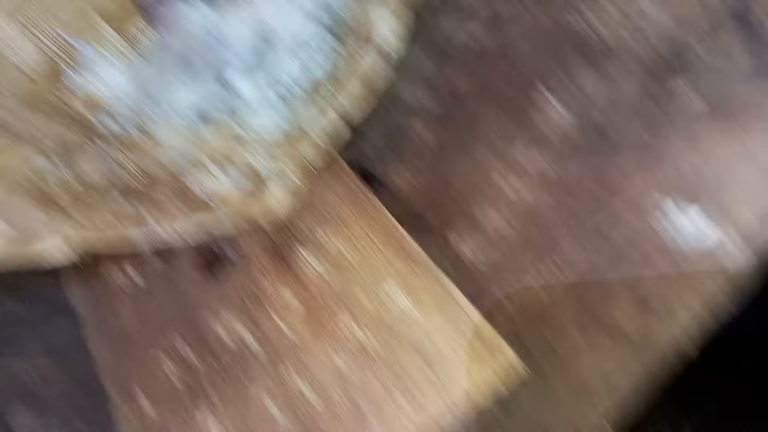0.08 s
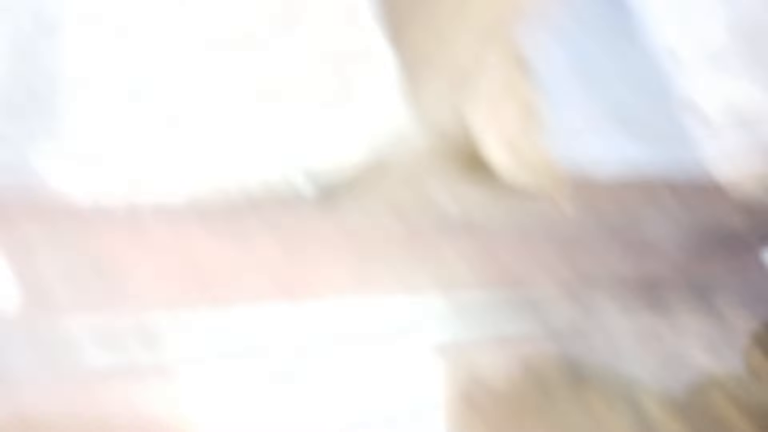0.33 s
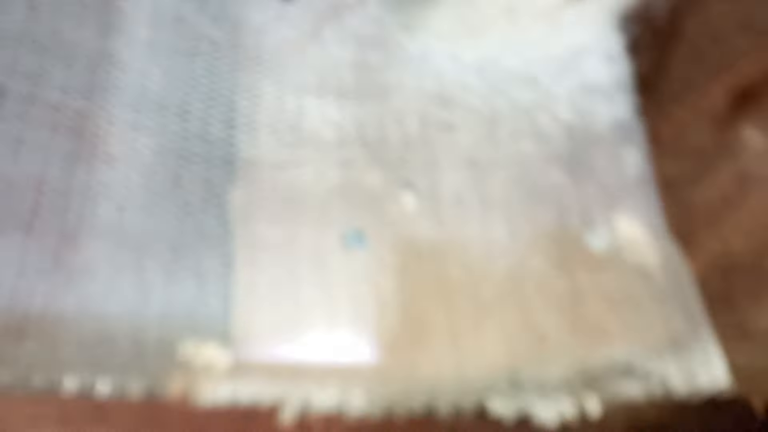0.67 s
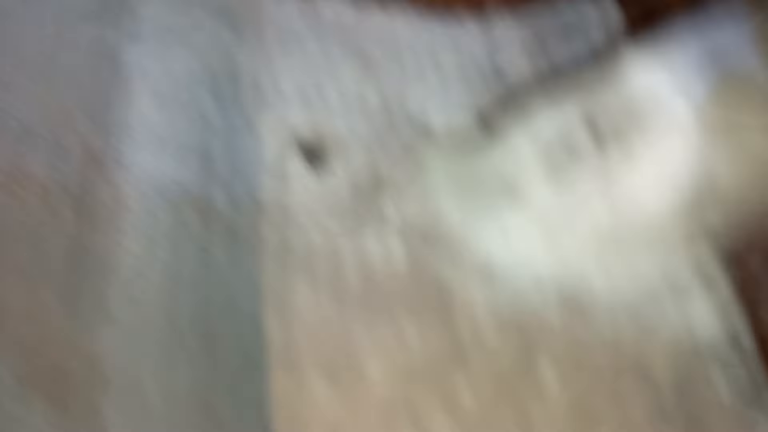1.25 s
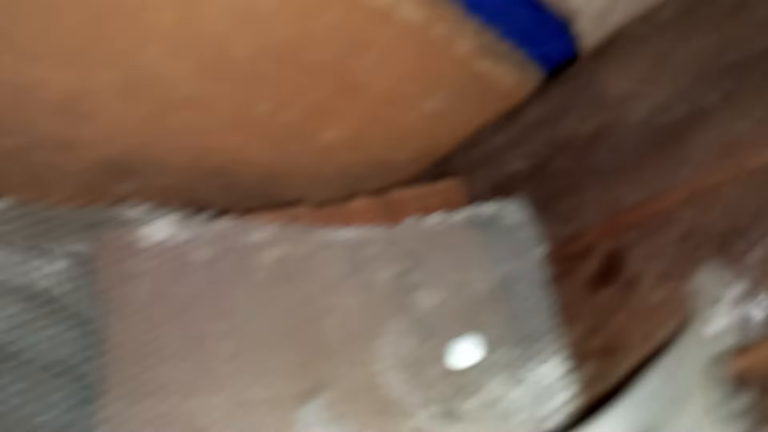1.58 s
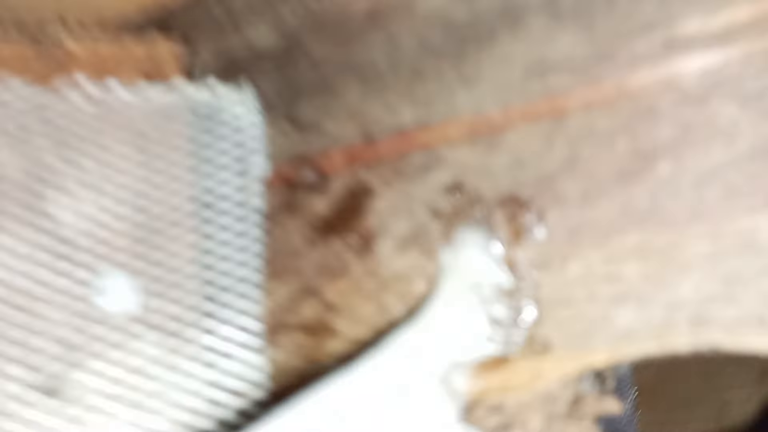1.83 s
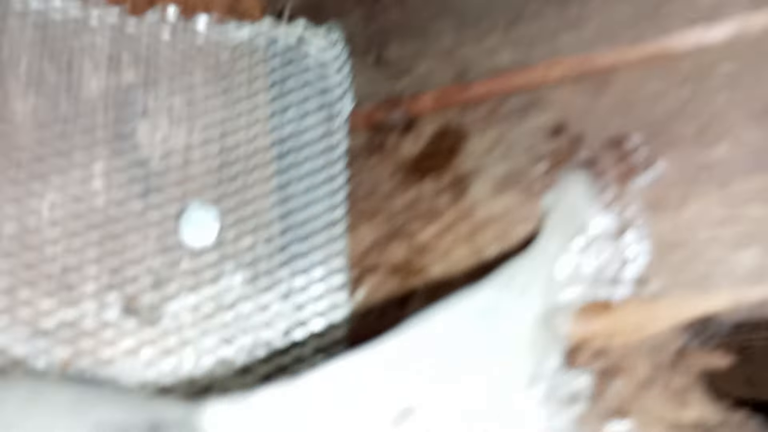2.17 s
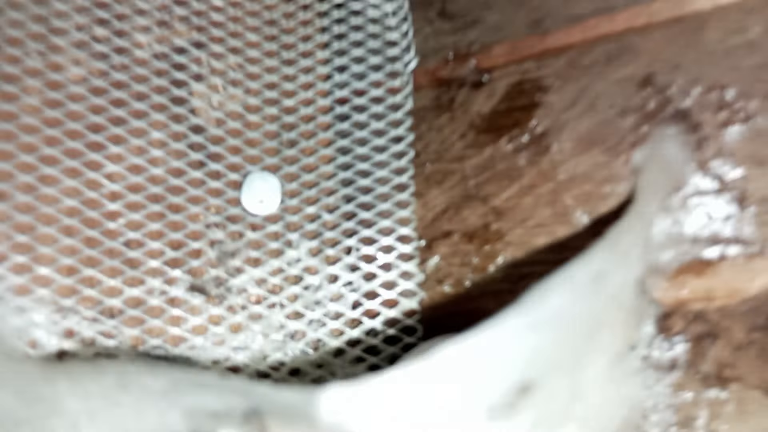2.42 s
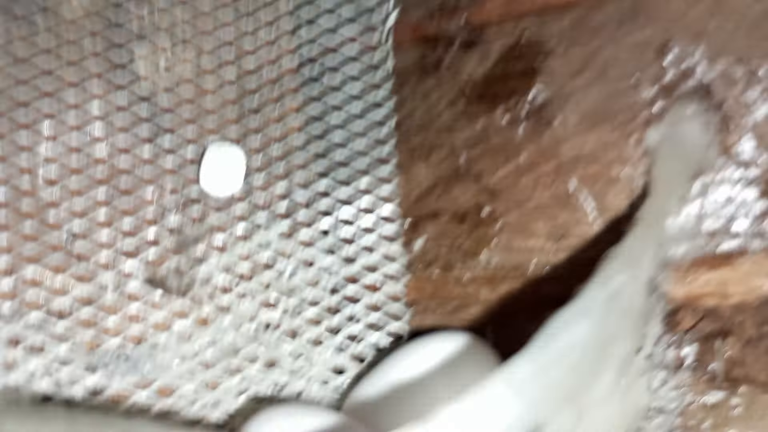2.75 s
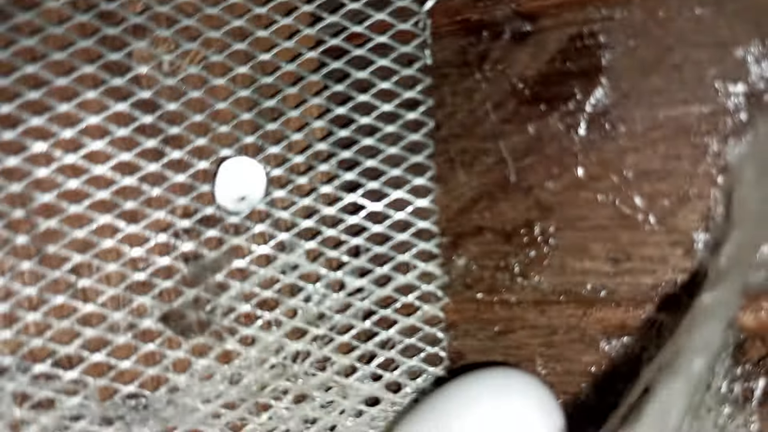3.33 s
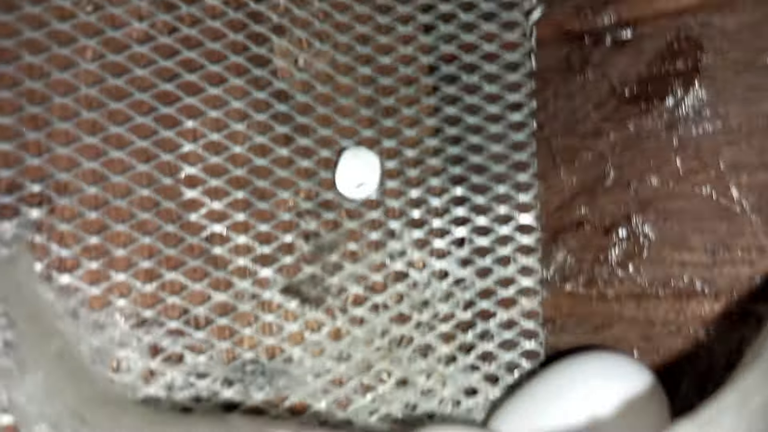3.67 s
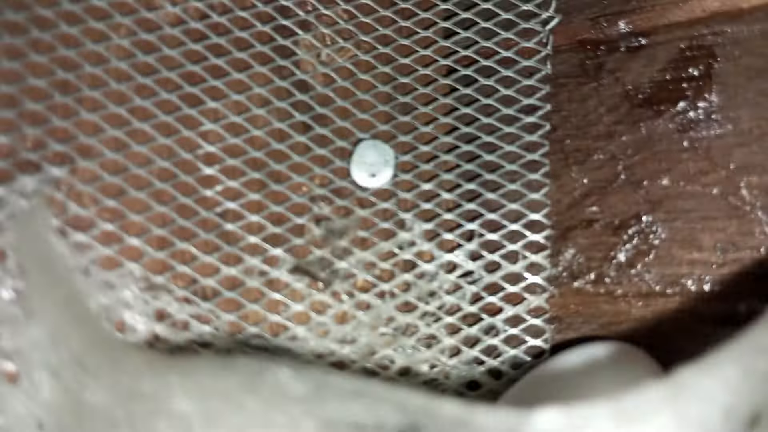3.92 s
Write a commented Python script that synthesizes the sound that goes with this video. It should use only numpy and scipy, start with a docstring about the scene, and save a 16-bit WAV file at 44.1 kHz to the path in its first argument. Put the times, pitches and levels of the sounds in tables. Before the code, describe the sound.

A colony of swiftlets twitters throughout the four seconds in an enclosed, slightly echoing room. From 0.4 seconds, a close bird repeats high, rising, slightly rough whistles about twice a second, loudest around 2.4 and 2.8. Another answers lower amid distant chirps. Faint bumps and rumble lie beneath, with a tick at 2 seconds. Sharp bird clicks come between 2.5 and 3.8 seconds.

```python
"""Inside a closed bird house, a colony of swiftlets twitters without pause.
One bird close by repeats a long, rising, slightly rough whistle, and a second answers lower down.
Others whistle and click further off, over a wash of far chirps and a faint rumble. Each whistle is
a tone with a trembling pitch, and the walls add a short echo. The loudest sounds overload the
microphone into a low crackle, and a few short low thumps and ticks come mostly with loud whistles."""
import sys
import numpy as np
from scipy import signal
from scipy.fft import rfft, irfft
from scipy.io import wavfile

SR = 44100
rng = np.random.default_rng(int(sys.argv[2]) if len(sys.argv) > 2 else 0)


def to_wav(s):
    """Save 16-bit WAV."""
    ch = np.atleast_2d(s).T  # columns
    pcm = np.round(np.clip(ch, -1, 1) * 32767)  # PCM
    wavfile.write(sys.argv[1], SR, pcm.astype(np.int16))


N = 176400
TIME = np.arange(N) / SR

# Levels in these tables are relative. A spectrum says how strong each frequency is.
# the background rumble: (frequency [Hz], level [dB])
RUMBLE_SPECTRUM = [(25, -22), (70, -8), (160, 4.5), (300, -12), (700, -29.5), (1500, 4), (4000, -26.5)]
# how the far colony swells and sinks: (time [s], level [dB])
COLONY_LOUDNESS = [(0, -6), (.04, -16), (.2, -20), (.3, -17.5), (.48, -15), (.52, -19.5), (.62, -18.5),
                   (.8, -17.5), (1.05, -20), (1.25, -19), (1.44, -18), (1.52, -20.5), (1.7, -19.5),
                   (1.92, -17), (1.98, -18.5), (2.15, -23.5), (2.32, -16.5), (2.45, -20), (2.57, -21.5),
                   (2.7, -24), (2.85, -20), (3.1, -22.5), (3.35, -21.5), (3.5, -22.5), (3.68, -17.5),
                   (3.8, -19.5), (4, -20)]
# the tone of the far colony: (frequency [Hz], level [dB])
COLONY_SPECTRUM = [(1200, -45), (1550, -20.5), (1900, -13.5), (2350, -13.5), (2900, -6.5), (3500, 1.5),
                   (4400, -0.5), (5200, -1.5), (5900, -1), (6700, -5.5), (7400, -7.5), (9500, -20),
                   (15500, -35)]
# thin, high twitter above the colony: (time [s], level [dB])
HIGH_TWITTER_LOUDNESS = [(0, -35), (.45, -32.5), (.95, -40.5), (1.15, -30.5), (1.4, -43), (1.65, -28),
                         (2.0, -43), (2.5, -37.5), (2.65, -55), (2.8, -34.5), (3.15, -39), (3.45, -32),
                         (4, -48.5)]
# the tone of that high twitter: (frequency [Hz], level [dB])
HIGH_TWITTER_SPECTRUM = [(6000, -24.5), (7200, 2), (9400, -9), (11700, -13), (13000, -22)]
# low twitter at the bottom of the chorus: (time [s], level [dB])
LOW_TWITTER_LOUDNESS = [(0, -44.5), (1.55, -47.5), (1.75, -25.5), (2.0, -37), (2.3, -30.5), (2.7, -39),
                        (2.95, -39), (4, -30)]
# the answering bird, one list of points per call: (time [s], pitch [Hz], level [dB])
ANSWER_CALLS = [
    [(0, 5570, -27), (.04, 5500, -19), (.1, 5470, -15), (.16, 5590, -23), (.2, 5560, -31)],
    [(.49, 5620, -30), (.56, 5780, -25.5), (.62, 5810, -17.5), (.68, 5720, -25.5), (.78, 5620, -32),
     (.92, 5600, -35), (.97, 5700, -38)],
    [(1.0, 5620, -32), (1.04, 5700, -33), (1.13, 5820, -22), (1.2, 5900, -35), (1.3, 5850, -26),
     (1.38, 5890, -21), (1.48, 5850, -39)],
    [(1.945, 5620, -21), (1.98, 5565, -19.5), (2.06, 5635, -16.5), (2.16, 5655, -20), (2.25, 5720, -19),
     (2.36, 5800, -27), (2.46, 5790, -28), (2.5, 5600, -28)],
    [(2.69, 5600, -31), (2.74, 5510, -21), (2.8, 5730, -23), (2.86, 5800, -23.5), (2.92, 5890, -19.5),
     (3.02, 5900, -26.5), (3.07, 5960, -21), (3.14, 6000, -26)],
    [(3.43, 6000, -18), (3.5, 5830, -30), (3.7, 5760, -27), (3.78, 5660, -32), (3.84, 5660, -23),
     (3.9, 5450, -28), (3.99, 5300, -27)],
]
# the neighbours' whistles:
# (start [s], length [s], first pitch [Hz], last pitch [Hz], level [dB], pitch tremble [Hz])
NEIGHBOUR_WHISTLES = [(0.236, 0.088, 2480, 2311, -34, 120), (.285, 0.081, 9400, 9060, -25.5, 229),
                      (0.306, .11, 8620, 8580, -21, 90), (.429, 0.053, 8200, 7860, -24.5, 151),
                      (0.436, .055, 5120, 4950, -19.5, 150), (0.593, 0.085, 8580, 8420, -29.5, 60),
                      (.69, .17, 8100, 8150, -30.5, 150), (0.702, 0.22, 5050, 5177, -24.5, 60),
                      (1.114, 0.11, 8480, 8080, -26.5, 90), (1.341, .13, 4390, 4184, -24, 131),
                      (1.502, 0.11, 5743, 5750, -26, 60), (1.836, 0.093, 4630, 4430, -24.5, 101),
                      (2.01, .14, 8150, 8350, -32.5, 109.9), (2.19, 0.27, 6130, 6180, -21, 50),
                      (2.239, .15, 6480, 6345, -18, 160), (2.418, 0.13, 8560, 8630, -29, 45),
                      (2.6, 0.13, 2450, 2700, -30.5, 200), (2.814, 0.1, 8350, 8060, -29.5, 100),
                      (3.195, 0.084, 8400, 8760, -26, 40.15), (3.291, 0.1, 8150, 8800, -24.5, 70),
                      (3.393, 0.029, 3570, 3550, -19, 40.4), (3.555, .24, 8450, 8280, -32, 110.5)]
# short low thumps and ticks, mostly at loud whistles: (time [s], peak level [dB], pulse width [s])
LOW_THUMPS = [(.329, -48, 0.0013), (0.449, -31, 0.00089), (0.627, -35, 0.00022), (0.72, -45, 0.00077),
              (0.817, -30.5, 0.00041), (1.744, -33.5, 0.00047), (2.029, -2.5, 0.000083),
              (2.37, -33.5, 0.00064), (2.742, -33.5, 0.00046), (3.733, -50, 0.00068)]
# the near bird, one list of points per call: (time [s], pitch [Hz], level [dB])
NEAR_BIRD_CALLS = [
    [(0.395, 6690, -26), (0.473, 6820, -15.5), (0.5, 6535, -27)],
    [(0.61, 6580, -24), (0.81, 7000, -17.5), (1.02, 7075, -21.5)],
    [(1.15, 6612, -23), (1.224, 6924, -19), (1.485, 6960, -19)],
    [(1.612, 6701, -17.5), (1.744, 6900, -13.5), (1.948, 6853, -18.5)],
    [(2.128, 6465, -16), (2.364, 6716, -9), (2.385, 6161, -21.5)],
    [(2.584, 6264, -20.5), (2.774, 6554, -10), (2.82, 6334, -19.5)],
    [(3.08, 6195, -19), (3.204, 6530, -14.5), (3.24, 6260, -20)],
    [(3.428, 6307, -18.5), (3.728, 6970, -14.5), (3.745, 6710, -18)],
    [(3.865, 7040, -18), (3.903, 6721, -13.5), (4.0, 6950, -15)],
]
# how hoarse each near call is: (pitch tremble [Hz], hiss level against the whistle [dB])
NEAR_HOARSENESS = [(109, -0.5), (50, -2), (60, -7), (112, -8), (119, -9), (40.2, -11), (40, -13.5),
                   (66, -9.5), (130, -7)]
# the weak upper voice in each near call: (level against the whistle [dB])
UPPER_VOICE_LEVELS = [-11, -19.5, -14.5, -26.5, -22, -20, -29.5, -32, -20.5]
# the hiss in the near bird's voice: (frequency [Hz], level [dB])
NEAR_HISS_SPECTRUM = [(1400, -36.5), (2200, -6), (3400, 1.5), (5000, 3.5), (6300, 0.5), (7600, -13),
                      (11000, -24), (15000, -22)]
# clicks that the birds use to find their way by echo: (time [s], level [dB])
ECHO_CLICKS = [(2.527, -16), (2.899, -9), (2.967, -6.5), (3.071, -6), (3.177, -20), (3.282, -5.5),
               (3.391, -14), (3.686, -10.5), (3.769, -26)]
# the tones that ring in one click: (pitch [Hz], level [dB])
CLICK_TONES = [(3500, -1.5), (4300, -25), (5300, -7.5)]


def from_db(db):
    """Turn decibels into a number to multiply a sound by."""
    return 10 ** (np.asarray(db) / 20)


def rms_one(x):
    """Scale a sound so that its average strength (rms) is 1."""
    return x / np.sqrt(np.mean(x ** 2) + 1e-20)


def along(rows):
    """Join a table's points with straight lines: one curve for each column after the time."""
    times, *columns = np.transpose(rows)
    return [np.interp(TIME, times, column) for column in columns]


def add(out, start_s, sound):
    """Mix a sound in at its start time."""
    i = int(np.clip(start_s * SR, 0, len(out)))
    out[i:i + len(sound)] += sound[:len(out) - i]


def butter(x, hz, kind, order=2):
    """Keep the low part, the high part or one band of a sound."""
    return signal.sosfilt(signal.butter(order, hz, kind, fs=SR, output="sos"), x)


def coloured(x, spectrum):
    """Shape a sound with a spectrum, then scale it to strength 1."""
    hz, db = np.transpose(spectrum)
    bin_hz = np.maximum(np.arange(N // 2 + 1) * SR / N, 1)
    gain = from_db(np.interp(np.log(bin_hz), np.log(hz), db))
    return rms_one(irfft(rfft(x) * gain, N))


def tone(hz):
    """A pure tone that follows a pitch curve."""
    return np.sin(2 * np.pi * np.cumsum(hz) / SR)


def waver(rate_hz):
    """A smooth random wobble of strength 1."""
    return rms_one(butter(rng.standard_normal(N), rate_hz, "low"))


def tremble(rate_hz):
    """A fast random shake of strength 1, with no slow drift."""
    return rms_one(butter(rng.standard_normal(N), [rate_hz / 6, rate_hz], "band"))


def gate(start_s, end_s, fade_s):
    """Fade in, hold, fade out."""
    return np.clip(np.minimum(TIME - start_s, end_s - TIME) / fade_s + .5, 0, 1)


def wall_echo(x, echo_db, die_away_s=.36, delay_s=.003):
    """Add the dense echo of the walls, keeping about the same loudness."""
    t = TIME[:SR // 2]
    tail = rng.standard_normal(len(t)) * from_db(-60 * t / die_away_s) * (t > delay_s)
    echo = signal.fftconvolve(x, tail / np.linalg.norm(tail))[:N]
    gain = from_db(echo_db)
    return (x + gain * echo) / np.hypot(1, gain)


def rumble(level_db=-67):
    """Faint, steady noise behind the birds."""
    return from_db(level_db) * coloured(rng.standard_normal(N), RUMBLE_SPECTRUM)


def colony(loudness, spectrum, lowest_hz, highest_hz, wash_db, chirps_per_s=170):
    """Hoarse chirps of far birds overlap and echo; the farthest blur into a wash of noise."""
    chirps = np.zeros(N)
    wash = rng.standard_normal(N)
    hoarseness = 1 + .016 * tremble(351)
    for when, pitch, length, glide, size, part in rng.random((int(chirps_per_s * N / SR), 6)):
        length_s = .05 + .1 * length
        u = np.linspace(-1, 1, int(length_s * SR))   # -1 at the chirp's start, 1 at its end
        octaves = .04982 * (2 * glide - 1) * u - .04007 * u ** 2   # a slide plus an arch
        middle_hz = lowest_hz + (highest_hz - lowest_hz) * pitch
        offset = int(part * (N - len(u)))
        hz = middle_hz * 2 ** octaves * hoarseness[offset:offset + len(u)]
        swell = from_db(7 * (2 * size - 1)) * (1 - u ** 2)
        add(chirps, when * N / SR, swell * tone(hz))
    chorus = rms_one(wall_echo(chirps, echo_db=-1.5)) + from_db(wash_db) * wash
    db, = along(loudness)
    return from_db(db - .5) * coloured(chorus, spectrum)


def low_twitter(middle_hz=2046, width_hz=173, throb_db=6):
    """The lowest twitter is a narrow band of noise that throbs unevenly."""
    db, = along(LOW_TWITTER_LOUDNESS)
    throb = from_db(throb_db * np.tanh(waver(21.7)))
    band = butter(rng.standard_normal(N), [middle_hz - width_hz / 2, middle_hz + width_hz / 2], "band")
    return from_db(db) * rms_one(throb * band)


def answering_bird(tremble_hz=45.3, wobble_hz=17.96, flutter_db=3, gain_db=1):
    """A bird sings long, nearly clean whistles that swell, bend and fade into the room."""
    hz, db = along([point for call in ANSWER_CALLS for point in call])
    singing = sum(gate(call[0][0], call[-1][0], fade_s=.017) for call in ANSWER_CALLS)
    hz = hz + tremble_hz * tremble(290) + wobble_hz * waver(29.7)
    level = singing * from_db(db + gain_db + flutter_db * waver(77))
    return wall_echo(np.sqrt(2) * level * tone(hz), echo_db=-4.5)


def neighbours(arch_hz=79.3, flutter_db=3, gain_db=2.2):
    """Other birds give short, sliding, slightly arched whistles, from clear to hoarse."""
    out = np.zeros(N)
    for start, length, first_hz, last_hz, db, tremble_hz in NEIGHBOUR_WHISTLES:
        progress = np.clip((TIME - start) / length, 0, 1)
        slide = first_hz + (last_hz - first_hz) * progress
        arch = arch_hz * (.5 - (2 * progress - 1) ** 2)
        hz = slide + arch + tremble_hz * tremble(244)
        level = gate(start, start + length, fade_s=.03) * from_db(db + gain_db + flutter_db * waver(110))
        on = level > 0
        out[on] += np.sqrt(2) * level[on] * tone(hz[on])
    return wall_echo(out, echo_db=-5)


def thumps():
    """Each short low thump or tick is one up-and-down pulse; a narrower pulse sounds brighter."""
    out = np.zeros(N)
    for when, db, width_s in LOW_THUMPS:
        u = (TIME - when) / width_s
        out -= from_db(db) * u * np.exp(np.maximum(1 - u * u, -100) / 2)
    return out


def upper_voice(whistle_hz, spans, late_s=.024, wobble_hz=24.96, flutter_db=3.75):
    """The near bird's weak second voice starts a little late and slides along above its whistle."""
    level = sum(from_db(db) * gate(start + late_s, end, fade_s=late_s)
                for (start, end), db in zip(spans, UPPER_VOICE_LEVELS))
    hz = .93 * whistle_hz + 4380 + wobble_hz * waver(26.2)
    return tone(hz) * level * from_db(flutter_db * waver(28))


def near_bird(wobble_hz=20, flutter_depth=.33, octave_db=-31, gain_db=1):
    """The closest bird sings a trembling whistle with a faint octave, a second voice and a hiss."""
    hz, db = along([point for call in NEAR_BIRD_CALLS for point in call])
    spans = [(call[0][0], call[-1][0]) for call in NEAR_BIRD_CALLS]   # each call's start and end
    tremble_hz, hiss_db = along([(s, *row) for span, row in zip(spans, NEAR_HOARSENESS) for s in span])
    singing = sum(gate(start, end, fade_s=.008) for start, end in spans)
    hz = hz + tremble_hz * tremble(375) + wobble_hz * waver(46.9)
    tones = tone(hz) + from_db(octave_db) * tone(2 * hz) + upper_voice(hz, spans)
    flutter = (1 + flutter_depth * waver(120)) / np.hypot(1, flutter_depth)
    hiss = from_db(hiss_db) * coloured(rng.standard_normal(N), NEAR_HISS_SPECTRUM)
    voice = np.sqrt(2) * tones * flutter + hiss
    return wall_echo(voice * singing * from_db(db + gain_db), echo_db=-13.5)


def clicks(rise_s=.00065):
    """Birds find their way with sharp clicks: three tones that die away almost at once."""
    out = np.zeros(N)
    t = TIME[:SR // 50]
    snap = t / rise_s * np.exp(1 - t / rise_s)
    for when, db in ECHO_CLICKS:
        ring = sum(from_db(tone_db) * np.sin(2 * np.pi * hz * rng.normal(1, .034) * t)
                   for hz, tone_db in CLICK_TONES)
        add(out, when, from_db(db) * ring * snap)
    return wall_echo(out, echo_db=-6)


def scene():
    """Mix the rumble, the birds near and far and the thumps, the same in both channels."""
    mono = rumble() + near_bird() + answering_bird() + neighbours() + low_twitter() + clicks() + thumps()
    mono += colony(COLONY_LOUDNESS, COLONY_SPECTRUM, lowest_hz=1787, highest_hz=7000, wash_db=-1)
    mono += colony(HIGH_TWITTER_LOUDNESS, HIGH_TWITTER_SPECTRUM,
                   lowest_hz=7220, highest_hz=11970, wash_db=-10)
    return np.array([mono, mono])


def record(dry, ceiling=.51, hardness=54, bias=.023, bass_db=9.5):
    """The microphone overloads on peaks, a little lopsidedly; bass is lifted and treble softened."""
    lopsided = signal.resample_poly(dry[0], 4, 1) + bias   # 4x the samples, to avoid false tones
    squashed = lopsided / (1 + np.abs(lopsided / ceiling) ** hardness) ** (1 / hardness) - bias
    x = signal.resample_poly(squashed, 1, 4)
    x = x + from_db(bass_db) * butter(x, hz=222, kind="low", order=1)
    x = butter(x, hz=68, kind="high")
    x = butter(x, hz=10930, kind="low")
    x = signal.sosfilt(signal.ellip(12, .1, 80, 15600, fs=SR, output="sos"), x)   # steep cut at 15.6 kHz
    return np.array([x, x])


dry = scene()
out = record(dry)
to_wav(out)
```